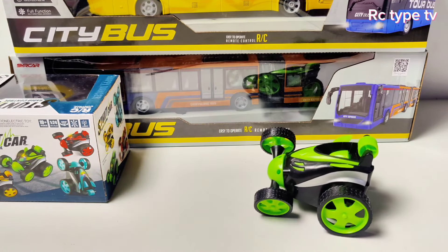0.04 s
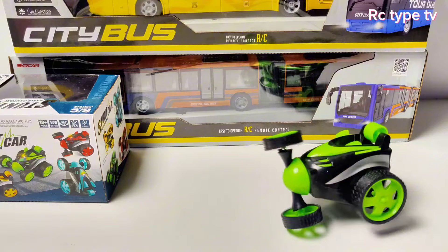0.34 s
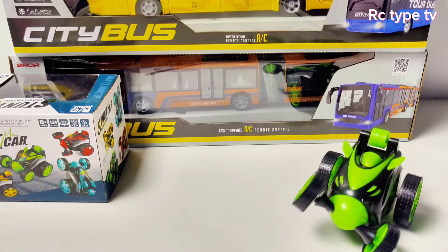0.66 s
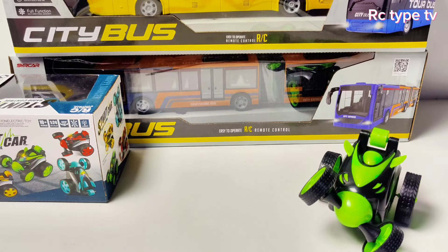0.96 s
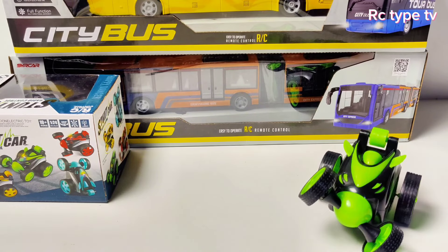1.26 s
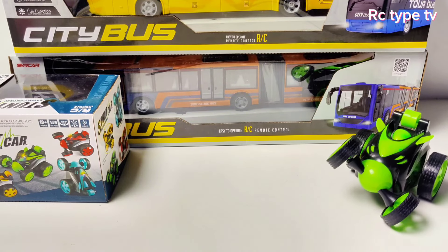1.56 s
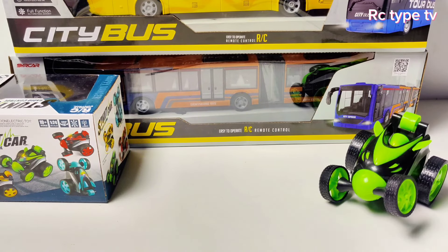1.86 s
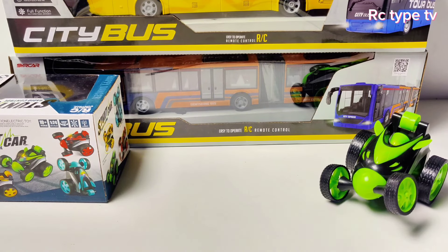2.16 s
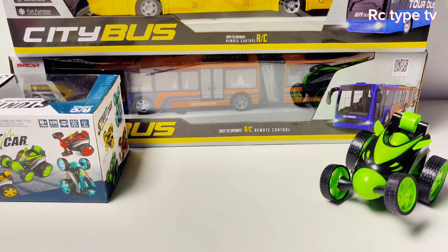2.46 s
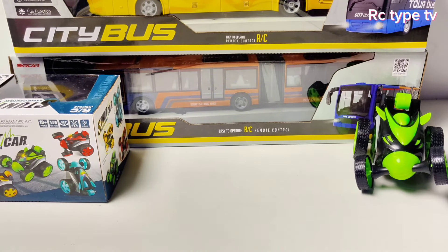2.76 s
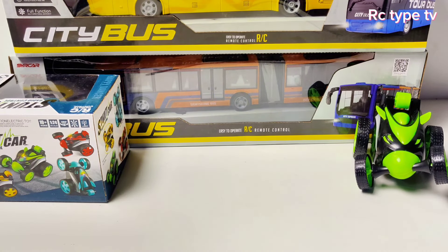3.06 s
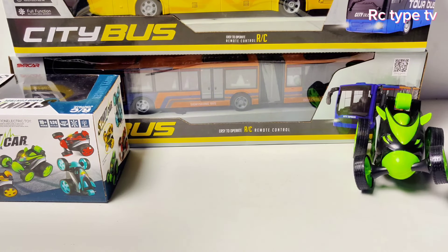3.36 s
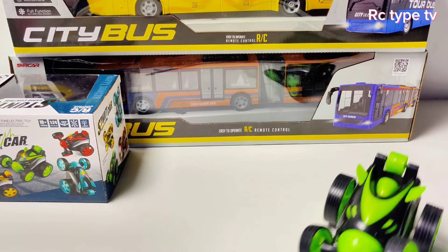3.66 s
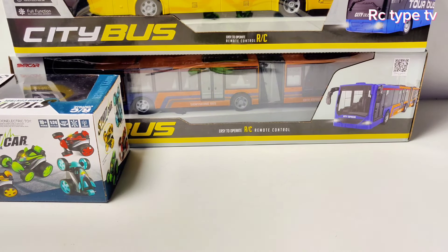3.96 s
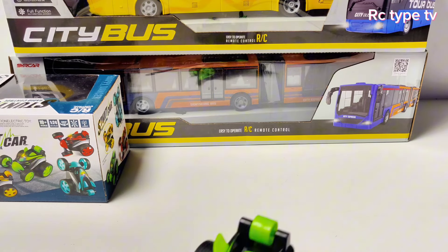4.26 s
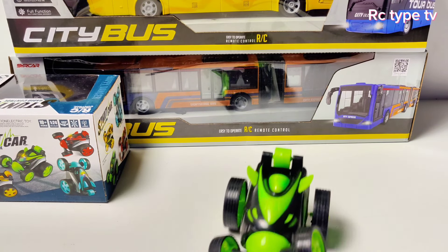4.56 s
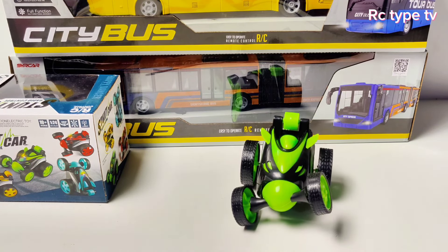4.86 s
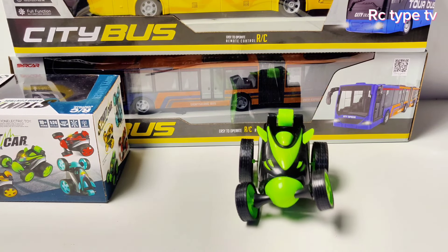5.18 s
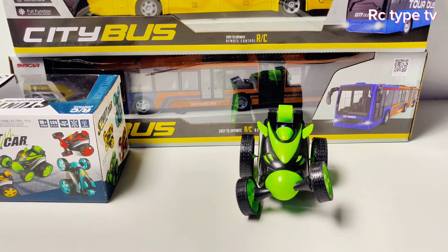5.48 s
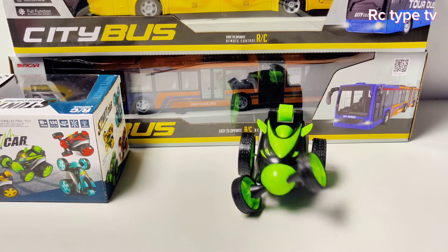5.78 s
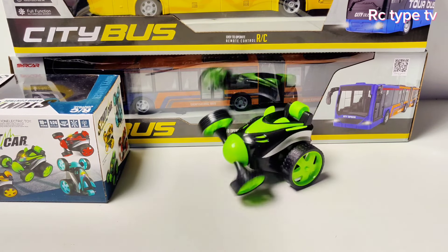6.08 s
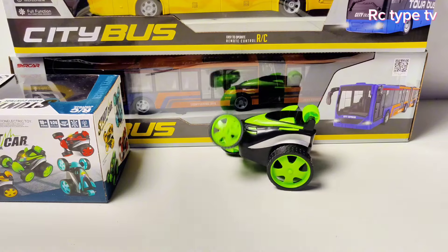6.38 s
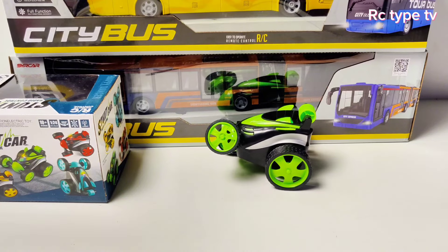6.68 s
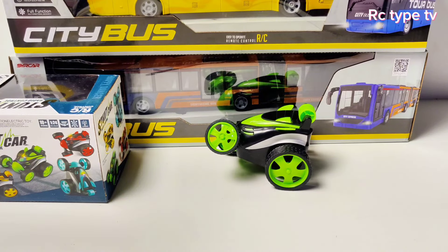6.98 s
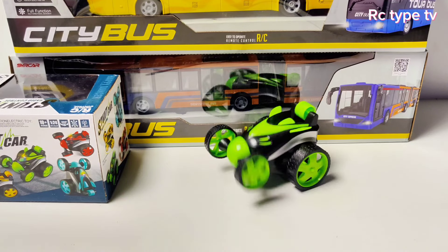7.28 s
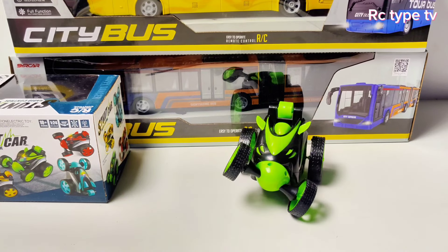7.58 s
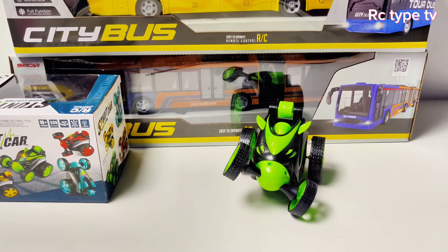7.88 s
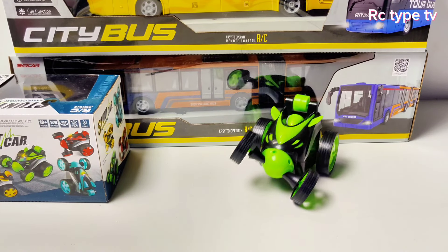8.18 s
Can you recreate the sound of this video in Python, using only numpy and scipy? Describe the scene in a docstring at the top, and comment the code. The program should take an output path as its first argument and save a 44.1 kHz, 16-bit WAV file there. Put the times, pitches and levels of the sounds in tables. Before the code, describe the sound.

Remote buttons click as a toy stunt car's geared motors buzz in bursts and it tumbles and knocks across a table.

```python
"""Toy stunt car on a tabletop

A small plastic car is driven in spurts in a quiet room. Buttons click on its remote control,
geared motors whirr and whine, and the tyres roll, judder and scrub. The spinning front axle tips
the car over, so its wheels knock on the table, ringing the board and the hollow plastic shell."""
import sys
import numpy as np
from scipy import signal
from scipy.fft import rfft, irfft
from scipy.io import wavfile

SR = 44100
rng = np.random.default_rng(int(sys.argv[2]) if len(sys.argv) > 2 else 0)


def store_pcm(level_fs):
    """Save levels as 16-bit WAV."""
    pcm = np.round(np.clip(level_fs, -1, 1) * 32767).astype(np.int16)
    wavfile.write(sys.argv[1], SR, np.atleast_2d(pcm).T)


N = 367353
TIME = np.arange(N) / SR
AGE = TIME[:SR // 2]  # seconds since a blow

# Wheel landings. Each row: start in seconds, then force, low thump and shell clack in relative dB.
LANDINGS = [(0.3478, -34, -34, -32), (0.4244, -25.5, -38, -37), (0.526, -34, -38, -35),
            (0.5581, -31, -41, -40.5), (0.6009, -28, -42, -41), (0.6917, -33.5, -38, -36.5),
            (0.7145, -32.5, -32.5, -38), (0.7726, -25.5, -37, -49), (0.8344, -40, -34, -48),
            (1.002, -71, -69, -56), (1.401, -58, -43, -51), (1.880, -27.5, -28.5, -29),
            (1.9486, -40.5, -34.5, -55), (2.082, -79, -72, -56), (2.619, -46, -42.5, -64),
            (2.7902, -32.5, -46, -46), (2.8899, -50, -41, -68), (4.237, -44.5, -44, -61),
            (4.637, -45, -39, -68), (5.846, -62, -57.5, -61), (5.982, -69, -34, -44),
            (6.0711, -29, -25.5, -35), (6.1727, -45, -39, -44), (6.199, -30.5, -51, -55),
            (6.2446, -26.5, -30.5, -35.5), (6.382, -30, -29, -39), (6.4229, -28, -33, -55),
            (6.4836, -35.5, -37.5, -49), (6.668, -60, -58, -53.5), (7.2142, -30, -32.5, -28),
            (7.3421, -34, -29, -45), (7.4219, -25.5, -28, -30.5), (7.5084, -31, -49, -32.5),
            (7.5944, -25, -33.5, -31.5), (7.6651, -36, -36, -39.5), (8.1922, -50, -56, -57),
            (8.2354, -48.5, -54, -47), (8.322, -36, -44, -64)]


def amp(db):
    """Decibels to gain."""
    return 10 ** (np.asarray(db) / 20)


def rms_one(x):
    """Scale to unit rms."""
    return x / np.sqrt(np.mean(x ** 2) + 1e-20)


def at_hz(points, hz):
    """Read a curve along a log-frequency axis."""
    known_hz, values = np.transpose(points)
    return np.interp(np.log(np.maximum(hz, 1)), np.log(known_hz), values)


def add(track, s, sound):
    """Mix a sound into a track at s seconds."""
    start = max(round(s * SR), 0)
    part = track[start:start + len(sound)]
    part += sound[:len(part)]


def colour(x, eq, size=8192):
    """Minimum-phase EQ, scaled so that white noise keeps its power."""
    gain = amp(at_hz(eq, np.arange(size // 2 + 1) * SR / size))
    cepstrum = irfft(np.log(gain))
    response = irfft(np.exp(rfft(2 * cepstrum[:size // 2], size)))
    return signal.fftconvolve(x, response / np.linalg.norm(response))[:len(x)]


def drift(per_s):
    """A random wander of unit rms that changes course per_s times a second."""
    knots = rng.standard_normal(N // 40)
    return rms_one(np.interp(TIME * per_s, np.arange(len(knots)), knots))


def resonance(x, hz, width_hz):
    """Two-pole band-pass with unit gain at its peak."""
    r = np.exp(-np.pi * width_hz / SR)
    feedback = [1, -2 * r * np.cos(2 * np.pi * hz / SR), r * r]
    return signal.lfilter(np.array([1, 0, -1]) * (1 - r * r) / 2, feedback, x)


def struck(modes):
    """Modes ring out after a blow; their balance and pitch vary with where it lands."""
    hz, db, t60 = np.transpose(modes)[:, :, None]
    share = amp(db) * rng.uniform(.5, 1.5, db.shape)
    share = share * np.linalg.norm(amp(db)) / np.linalg.norm(share)
    pitch = hz * rng.uniform(.97, 1.03, hz.shape)
    age = AGE[:SR // 4]
    return np.sum(share * np.exp(-np.log(1000) * age / t60) * np.sin(2 * np.pi * pitch * age), axis=0)


def burst(t60):
    """Noise that dies away by 60 dB in t60 seconds."""
    return rng.standard_normal(len(AGE)) * np.exp(-np.log(1000) * AGE / t60)


def grains(per_s, spread_db):
    """Tiny contacts of uneven size at random moments, at unit rms."""
    sizes = amp(spread_db * np.minimum(rng.exponential(1, N), 4)) * rng.choice([-1, 1], N)
    return rms_one(sizes * (rng.random(N) < per_s / SR))


def chatter(sound, span_s, count=5):
    """Hard plastic touches several times in quick succession, sharing out one blow's energy."""
    out = np.zeros(len(sound))
    delays = np.append(0, rng.uniform(0, span_s, count))
    for delay, sign in zip(delays, rng.choice([-1, 1], count + 1)):
        add(out, delay, sign * np.exp(-delay / span_s) * sound)
    return out * np.linalg.norm(sound) / np.linalg.norm(out)


def room_tone(level_db=-54):
    """A low, steady hush, turned down briefly at set times that follow some of the louder bursts."""
    # The hush's colour. Each row: frequency in Hz, relative level in dB.
    hush_eq = [(12, -28), (20, 4), (44, -12), (74, -7), (92, -15.5), (119, -11.5), (137, -22), (252, -34),
               (315, -37), (352, -33.5), (416, -39.5), (549, -41.5), (5090, -53), (12800, -52.5),
               (15500, -53)]
    # Dips in the gain on the hush. Each row: time in seconds, level offset in dB.
    gain_dips = [(0.9, 2.5), (1.15, -2), (1.35, 0.5), (2.8, 0), (3.0, -3.5), (3.25, 0), (5.05, 2.5),
                 (5.45, -4), (6.75, -3.5), (7.0, 0.5), (8.15, -2)]
    level = amp(level_db + np.interp(TIME, *np.transpose(gain_dips)))
    return level * colour(rng.standard_normal(N), hush_eq)


def buttons(ring_db=10, case_db=3, snap_db=7.5):
    """A switch snaps over, bounces briefly and knocks the hollow case of the remote."""
    # Each row: start in seconds, click in relative dB, ring pitch in Hz, case and snap in relative dB.
    presses = [(0.082, -46.5, 2200, -65, -51), (1.2923, -47.5, 3010, -51, -59),
               (1.6709, -50.5, 2910, -49, -52), (2.3192, -70, 3100, -57.5, -61),
               (2.5461, -51, 2860, -49.5, -61), (2.703, -55, 2640, -56, -61),
               (3.4236, -47.5, 3500, -62, -45.5), (3.5821, -58, 2810, -50.5, -55),
               (3.692, -48.5, 3330, -70, -46.5), (3.8012, -50.5, 2550, -53, -52),
               (4.0486, -46.5, 2920, -47.5, -75), (4.2906, -70, 2970, -49.5, -48),
               (4.436, -49.5, 2955, -51, -67), (5.1339, -49, 3040, -55, -57),
               (5.2472, -52.5, 1790, -52, -54), (5.7065, -56, 2020, -50, -55),
               (6.9036, -56.5, 3400, -53, -56), (7.0196, -38, 2190, -42.5, -50),
               (8.0884, -55.5, 1820, -58.5, -53.5)]
    # A button's modes. Each row: ratio to the ring pitch, relative level in dB, undamped t60 in seconds.
    button_modes = [(0.7, -17, 0.0078), (0.88, -10, 0.0025), (1.0, 0, 0.015), (1.1, -0.5, 0.0097),
                    (1.23, -23, 0.0026), (1.42, -12.5, 0.026)]
    # The case's modes. Each row: frequency in Hz, relative level in dB, undamped t60 in seconds.
    case_modes = [(1110, -8, 0.037), (1392, 2.5, 0.033), (1430, -22, 0.03), (1900, -6, 0.061)]
    # The snap's colour. Each row: frequency in Hz, relative level in dB.
    snap_eq = [(600, -70), (1300, -20), (2200, 10.5), (3500, 14), (5500, -4), (7500, 1), (10000, -7),
               (15000, -11)]
    hand_damping = 0.53  # the hand around the remote cuts the ring time to this share
    rings, snaps = np.zeros(N), np.zeros(N)
    for s, click, hz, case, snap in presses:
        button_ring = struck(np.array(button_modes) * [hz, 1, hand_damping])
        add(rings, s, amp(click + ring_db) * chatter(button_ring, span_s=.003, count=3))
        case_ring = struck(np.array(case_modes) * [1, 1, hand_damping])
        add(rings, s, -amp(case + case_db) * case_ring)
        add(snaps, s, amp(snap + snap_db) * burst(t60=0.014))
    low_cut = signal.butter(4, 950, "high", fs=SR, output="sos")  # so small a case radiates no bass
    return signal.sosfilt(low_cut, rings + colour(snaps, snap_eq))


def spurt_level(t, rise_s, hold_s, brake_db_per_s, coast_db=-20, coast_db_per_s=55):
    """Gain t seconds after a motor switches on: it spins up, holds, brakes, then coasts faintly."""
    spin_up = np.clip(t / rise_s, 0, 1) ** 1.8
    off_s = np.maximum(t - rise_s - hold_s, 0)
    slowing_db = np.maximum(-brake_db_per_s * off_s, coast_db - coast_db_per_s * off_s)
    return spin_up * amp(slowing_db)


def motion():
    """Envelopes for the gears, the tread and the table's rumble; the strongest spurt leads in each."""
    # Motor spurts. Each row: start, spin-up and hold in seconds, then gears, tread and rumble in dB.
    spurts = [(0.203, 0.12, 0.15, -51, -55.5, -44.5), (0.46, .13, 0.039, -52, -46, -35),
              (0.648, .06, .09, -51.5, -53.5, -43.5), (1.361, 0.064, 0.096, -64.5, -62.5, -53),
              (1.77, 0.11, 0.086, -62.5, -57.5, -50.5), (2.56, 0.11, 0.14, -63, -59.5, -46.5),
              (3.401, 0.39, .27, -63, -60, -46), (4.132, 0.09, 0.032, -59, -54.5, -43.5),
              (4.288, 0.028, 0.056, -64.5, -56.5, -47.5), (4.462, .10, 0.029, -53.5, -49, -43.5),
              (4.623, 0.051, 0.14, -68.5, -58.5, -57.5), (5.208, 0.068, 0.053, -76, -63, -51.5),
              (5.861, 0.13, 0.083, -49, -61, -46.5), (6.08, 0.12, .04, -49, -44.5, -37.5),
              (6.266, .07, 0.17, -53, -52, -42), (7.133, 0.045, .04, -56, -61, -51),
              (7.237, 0.12, 0.053, -48, -53, -41), (7.466, 0.027, 0.098, -53.5, -53.5, -39.5),
              (7.629, 0.027, .02, -63, -58.5, -45.5), (8.163, 0.052, 0.13, -69.5, -61.5, -53)]
    brake_db_per_s = np.array([185.5, 150, 150])[:, None]  # gears, tread, rumble
    t, levels = TIME[::40], 0
    for s, rise_s, hold_s, *db in spurts:
        envelope = spurt_level(t - s, rise_s, hold_s, brake_db_per_s)
        levels = np.maximum(levels, amp(db)[:, None] * envelope)
    return [np.interp(TIME, t, level) for level in levels]


def gearbox(teeth, leak_db=-12, shift_db=4.0):
    """Tooth forces ring the gearbox, each resonance shifting in level with the load; some leak out."""
    # The box's resonances. Each row: centre in Hz, width in Hz, relative level in dB.
    box_modes = [(655, 72, 1.5), (1540, 72, 6), (1820, 690, -5.5), (2370, 350, 2.5), (3320, 750, -0.5),
                 (4150, 220, 5), (4610, 640, -2), (5420, 310, 2), (6230, 590, -3.5), (6960, 190, 6),
                 (7540, 730, 0.5), (9880, 1000, 1.5)]
    # The colour of the teeth. Each row: frequency in Hz, relative level in dB.
    tooth_eq = [(200, -10), (600, 1.5), (3000, 2), (7800, -2.5), (9000, -11), (12000, -4), (15500, -19)]
    box = amp(leak_db) * teeth
    for k, (hz, width_hz, db) in enumerate(box_modes):
        gain = (-1) ** k * amp(db + shift_db * drift(50))
        box += gain * resonance(teeth, hz, width_hz)
    return rms_one(colour(box, tooth_eq))


def gears(drive, mesh_hz=640, backlash_db=-1.5, surge_db=0.55):
    """Two gear stages tick and rub, faster as the motor is driven harder; slack teeth clatter."""
    tooth_hz = mesh_hz * (drive / drive.max() + .01) ** .08 * (1 + .02 * drift(30))
    cycles = np.cumsum(tooth_hz) / SR
    ticks = sum(np.diff(np.floor(cycles * ratio), prepend=0) for ratio in (1, .61))
    ticks = rms_one(ticks * amp(2 * drift(220)))
    rub = rms_one(rng.standard_normal(N) * np.exp(-2 * (cycles % 1)))
    backlash = amp(backlash_db) * grains(per_s=260, spread_db=2.5)
    surge = amp(-surge_db * drift(140))
    return drive * gearbox((ticks + rub + backlash) * surge)


def tyres(tread, rumble, bump_db=2.57):
    """Ribs of the tread patter on the table, ring in the hollow wheels and shake the board."""
    # The colours of the patter and of the board. Each row: frequency in Hz, relative level in dB.
    patter_eq = [(200, -32.5), (500, -6), (740, -2), (1100, -7), (1300, -5.5), (1600, -18), (2200, -13),
                 (3500, -23.5), (8000, -42)]
    board_eq = [(30, -8), (70, -2.5), (115, 2.5), (160, -8.5), (225, -12), (285, -8), (370, -16.5),
                (500, -27.5), (1000, -54.5)]
    bumps = rms_one(amp(bump_db * drift(45)))
    patter = colour(grains(per_s=1400, spread_db=3.0), patter_eq)
    board = colour(grains(per_s=700, spread_db=1.0), board_eq)
    return bumps * (tread * patter + rumble * board)


def judders():
    """A dragged tyre sticks and slips at a nearly steady rate, and each slip jolts the gearbox."""
    # Each row: peak time and half length in seconds, slip rate in Hz, tone and gearbox buzz in dB.
    drags = [(0.298, 0.02, 384, -34.5, -48.5), (5.959, 0.014, 411, -55, -54),
             (7.165, 0.0092, 680, -55, -67), (7.684, 0.007, 307, -28.5, -48)]
    out = np.zeros(N)
    for s, half_s, hz, tone_db, buzz_db in drags:
        slips = np.cumsum(hz * (1 + .025 * drift(300))) / SR
        jolts = np.diff(np.floor(slips), prepend=0) * amp(3 * rng.standard_normal(N))
        dull_buzz = rms_one(signal.lfilter([1], [1, -.8], gearbox(jolts)))
        swell = np.exp(-((TIME - s) / half_s) ** 2)
        out += swell * (amp(tone_db) * np.sin(2 * np.pi * slips) + amp(buzz_db) * dull_buzz)
    return out


def whine(roughness=.035, overtones_db=-15.5, settle_s=.22):
    """The drive gear's note glides and settles with the car's speed; tyre bumps chop it hoarse."""
    # Each row: peak time, swell and fade in seconds, then, at the peak, pitch in Hz,
    # glide in Hz per second and level in dB.
    notes = [(0.31, 0.014, 0.065, 1565, 302, -47), (1.44, 0.043, 0.038, 1380, 6999.5, -58),
             (3.92, 0.26, 0.29, 949, -1450, -60), (4.62, 0.094, 0.19, 1066, 1400.5, -55),
             (4.75, 0.2, 0.079, 4135, 0.5, -69.5)]
    out = np.zeros(N)
    for s, swell_s, fade_s, hz, glide_hz_per_s, db in notes:
        t = TIME - s
        pitch = hz + glide_hz_per_s * settle_s * np.tanh(t / settle_s)
        phase = 2 * np.pi * np.cumsum(pitch * (1 + roughness * drift(350))) / SR
        tone = np.sin(phase) + amp(overtones_db) * (np.sin(2 * phase) + np.sin(3 * phase) / 2)
        chop = .6 + drift(420)
        swell = np.exp(-(t / np.where(t < 0, swell_s, fade_s)) ** 2)
        out += amp(db) * swell * rms_one(tone * chop)
    return out


def knocks(drive, contact_s=0.0023, axle_play_s=0.00498):
    """A landing wheel pushes the table down and rings it, itself and the shell; loose parts rattle."""
    # Modes of the tabletop (middle and low), a hollow wheel and the plastic shell.
    # Each row: frequency in Hz, relative level in dB, t60 in seconds.
    table_modes = [(277.3, -0.5, 0.11), (326, 2.5, 0.048), (415, -0.5, 0.073), (484, -14, 0.18)]
    thump_modes = [(105.3, -19, 0.38), (116.6, 0.5, 0.19), (146.6, -24, 0.65), (183.6, -0.5, 0.11)]
    wheel_modes = [(550, -7.5, 0.032), (643.7, -4, 0.091), (703, -5, 0.047), (790, -11.5, 0.068),
                   (953, 2, 0.011), (1073, -11.5, 0.11)]
    shell_modes = [(1280, -14, 0.04), (1521, -0.5, 0.05), (1650, -0.5, 0.027), (1756, -5.5, 0.052),
                   (2060, -6.5, 0.037), (2290, -5.5, 0.022), (2770, -5.5, 0.017), (3510, -13, 0.015)]
    # The rattle's colour. Each row: frequency in Hz, relative level in dB.
    rattle_eq = [(500, -3.5), (1500, 11), (3000, 4.5), (5000, 3), (7600, 1.5), (10000, -10.5),
                 (15500, -17.5)]
    push_db, table_db, thump_db, wheel_db, shell_db, rattle_db = -25, -6, -2, -6.5, -3.5, 1.5
    motor_share = 0.58  # the running gears set this much of the rattle's level, the force the rest
    out, loose = np.zeros(N), np.zeros(N)
    push = np.sin(np.pi * np.minimum(AGE / contact_s, 1)) ** 2
    for s, force, thump, clack in LANDINGS:
        add(out, s, -amp(force + push_db) * push)
        add(out, s, -amp(force + table_db) * struck(table_modes))
        add(out, s, -amp(thump + thump_db) * struck(thump_modes))
        # the axle has play and strikes its bearing again
        add(out, s, amp(force + wheel_db) * chatter(struck(wheel_modes), axle_play_s))
        add(out, s, amp(clack + shell_db) * chatter(struck(shell_modes), axle_play_s))
        shake = np.interp(s, TIME, drive) ** motor_share * amp(force) ** (1 - motor_share)
        add(loose, s, amp(rattle_db) * shake * burst(t60=0.07))
    return out + colour(loose * grains(per_s=7100, spread_db=1.5), rattle_eq)


def cracks(crack_db=-11):
    """Each landing opens with a brief, bright crack as the hard plastic first makes contact."""
    # The crack's colour. Each row: frequency in Hz, relative level in dB.
    crack_eq = [(400, -16), (1000, 0), (3000, 2.5), (7500, -4), (10000, -8), (15500, -12.5)]
    out = np.zeros(N)
    for s, force, *_ in LANDINGS:
        add(out, s, amp(force + crack_db) * burst(t60=.018))
    return colour(out * grains(per_s=5000, spread_db=3), crack_eq)


def scrubs():
    """Rubber dragged sideways in a swerve or reversal fizzes in fine, bright grains."""
    # Each row: peak time in seconds, half length in seconds, level in dB.
    swerves = [(0.59, .05, -62), (1.453, 0.051, -67), (1.86, 0.042, -69), (2.7, 0.076, -66),
               (4.24, 0.068, -61)]
    # The fizz's colour. Each row: frequency in Hz, relative level in dB.
    fizz_eq = [(2000, -22), (5000, 4), (9000, -8), (13500, 0), (15500, -7)]
    swell = sum(amp(db) * np.exp(-((TIME - s) / half_s) ** 2) for s, half_s, db in swerves)
    return swell * colour(grains(per_s=2700, spread_db=4.5), fizz_eq)


def room(x, early_db=1, early_t60=0.096, gap_s=.002):
    """Quick reflections off the table and boxes, then the room's tail, whose top octaves die first."""
    # The tail's decay. Each row: frequency in Hz, t60 in seconds.
    decay = [(150, 0.25), (1500, 0.29), (5000, 0.098), (14000, 0.038)]
    edges_hz = 80 * 2. ** np.arange(9)
    tail = 0
    for low, high in zip(edges_hz, edges_hz[1:]):
        octave = signal.butter(2, [low, high], "band", fs=SR, output="sos")
        tail = tail + signal.sosfilt(octave, burst(at_hz(decay, np.sqrt(low * high))))
    early = burst(early_t60)
    response = tail / np.linalg.norm(tail) + amp(early_db) * early / np.linalg.norm(early)
    return signal.fftconvolve(x, response * (AGE > gap_s))[:N]


def scene():
    """The car up close and the remote a little further off, over a hush whose level dips briefly."""
    drive, tread, rumble = motion()
    whirr = amp(0.5) * gears(drive)
    car = whirr + tyres(tread, rumble) + knocks(drive) + scrubs() + cracks() + judders() + whine()
    remote = buttons()
    hush = room_tone()
    echoes = room(amp(-14.5) * car + amp(-12.5) * remote)
    return (car + remote + echoes + hush)[None]


def record(dry, cutoff_hz=15700):
    """A steep low-pass takes off the very top of the treble."""
    return signal.sosfilt(signal.ellip(10, .1, 70, cutoff_hz, fs=SR, output="sos"), dry)


dry = scene()
out = record(dry)
store_pcm(out)
```